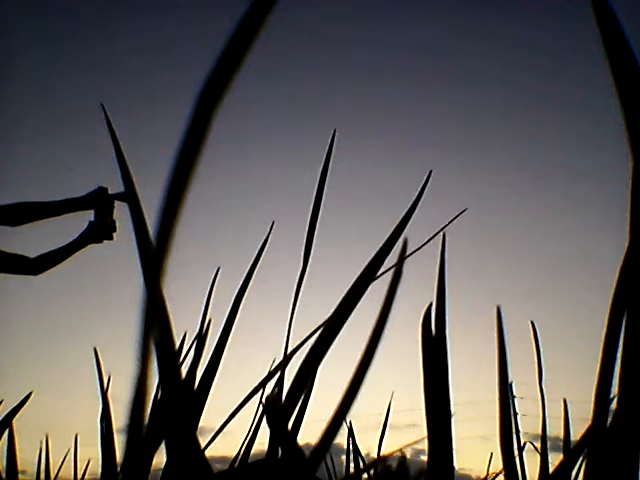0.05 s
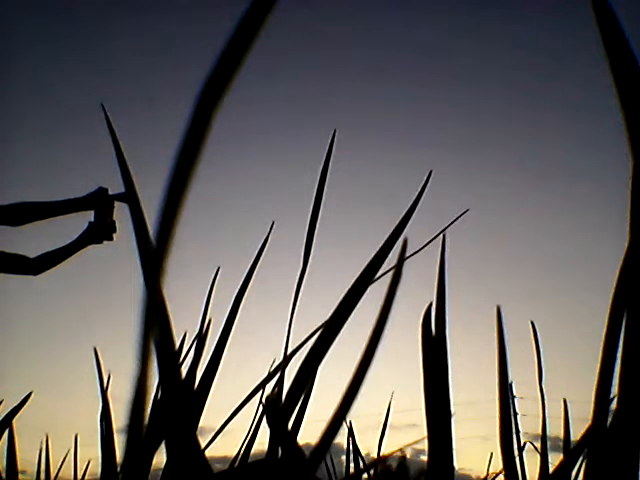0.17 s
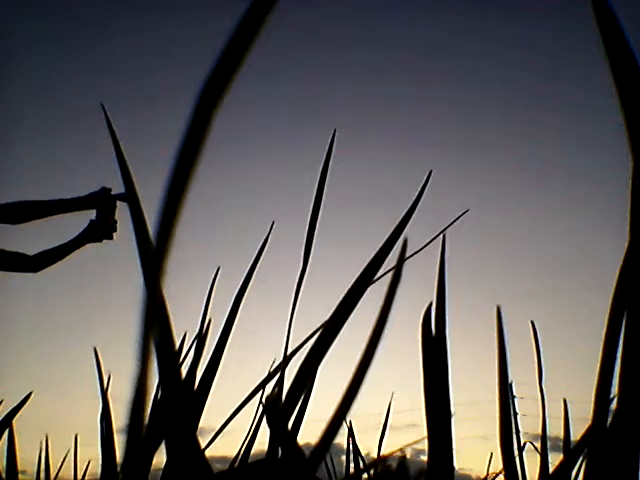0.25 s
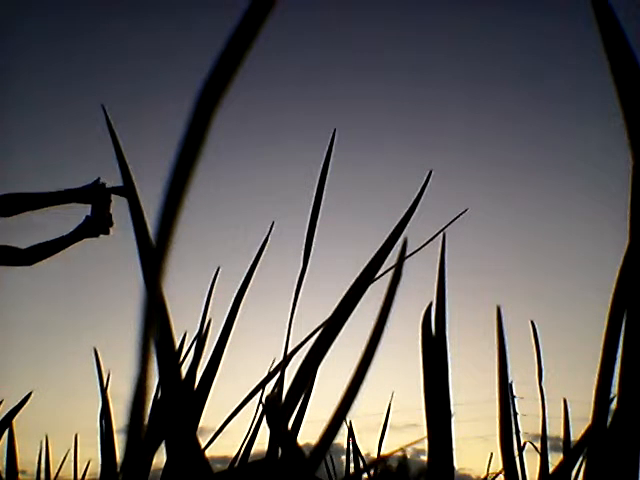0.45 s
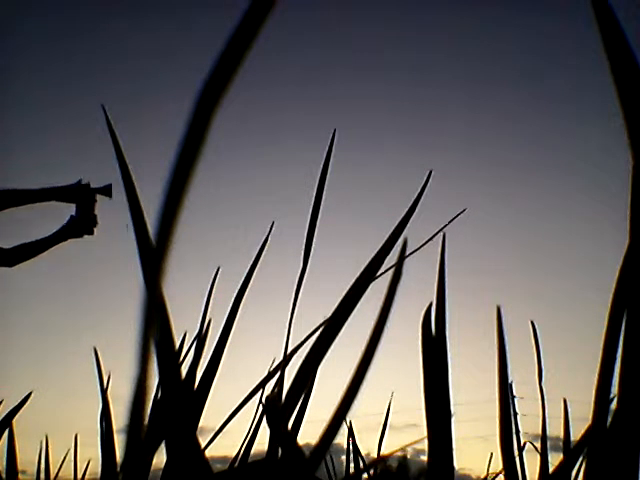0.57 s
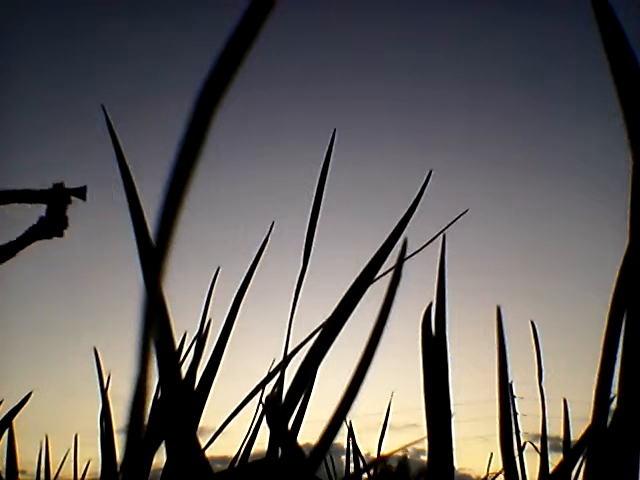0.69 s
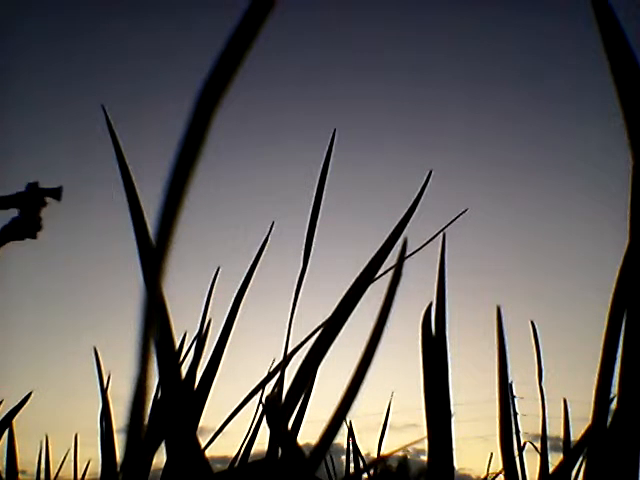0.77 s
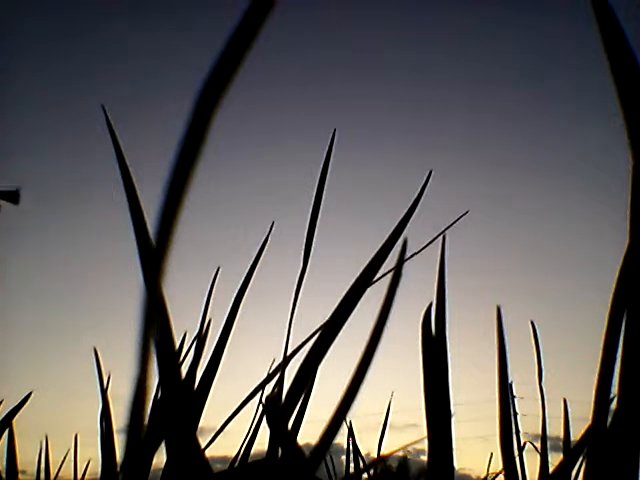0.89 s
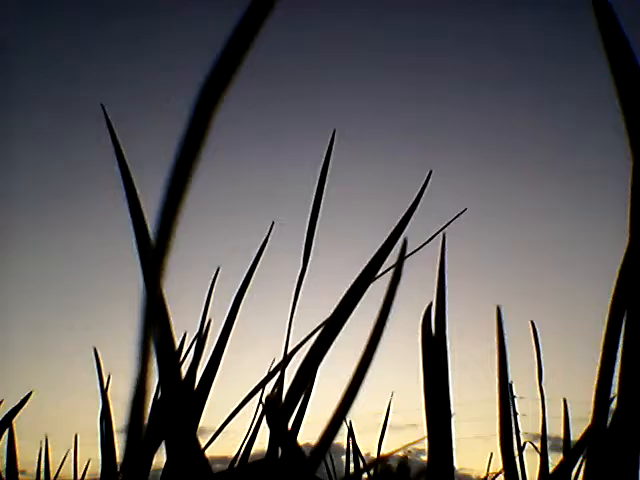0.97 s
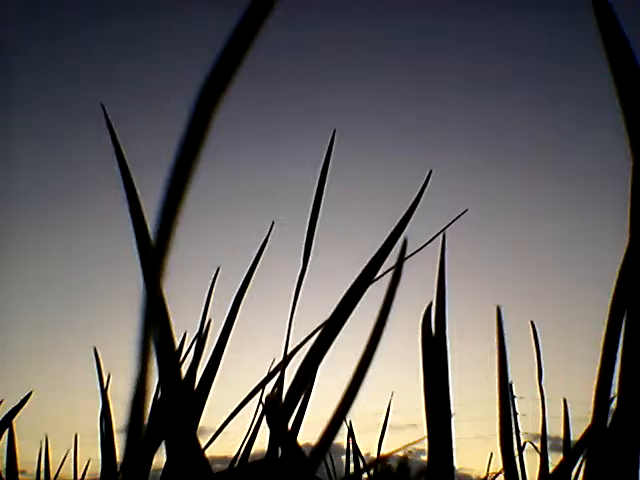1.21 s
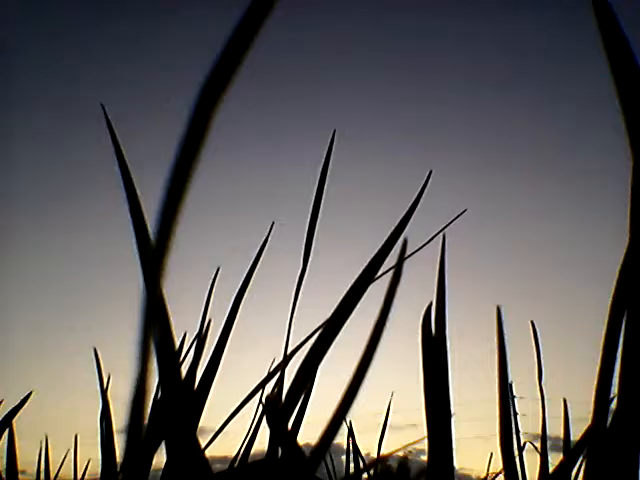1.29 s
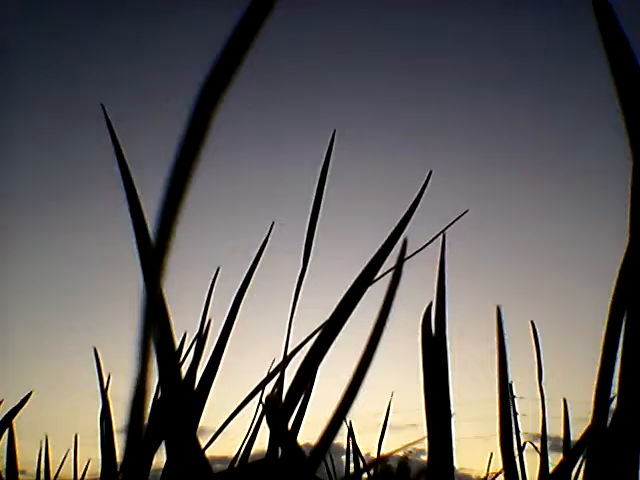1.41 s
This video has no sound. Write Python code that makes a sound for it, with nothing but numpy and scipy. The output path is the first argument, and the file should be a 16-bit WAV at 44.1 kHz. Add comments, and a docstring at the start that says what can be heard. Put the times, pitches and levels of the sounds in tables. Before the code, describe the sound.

One short air horn blast with a hiss, echoing outdoors over a faint distant rumble.

```python
"""Gas horn in a field

A hand-held gas horn gives one short blast at dusk, over a distant rumble. Gas hisses out; the diaphragm
starts high, drops onto its note and turns brassy, and the blast overloads the microphone with a low
thump. The field and far trees reflect the sound to that stereo microphone in the grass, whose gain
control ducks the rumble under the blast and lets it back up a second later."""
import sys
import numpy as np
from scipy.fft import rfft, irfft, next_fast_len
from scipy.io import wavfile
from scipy.ndimage import uniform_filter1d, minimum_filter1d, map_coordinates

SR = 44100
rng = np.random.default_rng(int(sys.argv[2]) if len(sys.argv) > 2 else 0)


def to_wav(s):
    """Save 16-bit WAV."""
    ch = np.atleast_2d(s).T  # columns
    pcm = np.round(np.clip(ch, -1, 1) * 32767)  # PCM
    wavfile.write(sys.argv[1], SR, pcm.astype(np.int16))


N = 63945
T = np.arange(N) / SR


def amp(db):
    """Amplitude ratio of a level in decibels."""
    return 10 ** (np.asarray(db) / 20)


def unit(x):
    """Normalisation to rms 1."""
    return x / np.sqrt(np.mean(x ** 2) + 1e-20)


def curve(rows, ends=None):
    """Linear interpolation of (seconds, value) rows at every sample."""
    return np.interp(T, *np.transpose(rows), left=ends, right=ends)


def wobble(rate):
    """Smooth random variation: a spline through rate knots a second."""
    return map_coordinates(rng.standard_normal(int(N * rate / SR) + 4), [T * rate])


def pan(db):
    """Two gains with a level difference of db, left minus right."""
    return amp([[db / 2], [-db / 2]])


def delayed(x, seconds):
    """Propagation delay, to a fraction of a sample."""
    return map_coordinates(x, [(T - seconds) * SR])


def convolve(x, h):
    """Response to x of a linear system with impulse response h."""
    size = next_fast_len(2 * N)
    return irfft(rfft(x, size) * rfft(h, size), size)[..., :N]


def colour(x, points, size=8192):
    """Minimum-phase filter through (Hz, dB) points, made by folding the cepstrum."""
    hz, db = np.transpose(points)
    gain = amp(np.interp(np.log(np.fft.rfftfreq(size, 1 / SR) + 1), np.log(hz), db))
    cepstrum = irfft(np.log(gain))
    cepstrum[1:size // 2] *= 2
    cepstrum[size // 2 + 1:] = 0
    return convolve(x, irfft(np.exp(rfft(cepstrum))))


def scatter(delay, t60, rise=.001):
    """Diffuse reflection: a stereo response of unit energy that builds up, then decays exponentially."""
    age = np.maximum(T - delay, 0)
    response = rng.standard_normal((2, N)) * (1 - np.exp(-age / rise)) * amp(-60 * age / t60)
    return unit(response) / np.sqrt(N)


# Rumble spectrum. Each row: frequency in Hz, relative density in dB.
RUMBLE_SPECTRUM = [(15, -53.5), (25, -23), (97, -1), (157, -3), (189, -4), (297, -11), (443, -20),
                   (493, -19), (563, -26.5), (735, -29), (862, -33.5), (1630, -48), (5270, -48),
                   (6520, -44.5), (14500, -49.5)]
# Stereo width. Each row: frequency in Hz, side relative to mid in dB.
RUMBLE_WIDTH = [(40, -19), (150, -16.5), (600, -3.5), (4000, 0.5)]
# Stereo balance. Each row: frequency in Hz, left minus right in dB.
RUMBLE_PAN = [(100, -2), (300, -3), (1200, -0.5), (4500, 0.5), (6300, -3), (9000, 4.5)]
# Slow swell. Each row: time in seconds, level in dB.
RUMBLE_LEVEL = [(0, -37.5), (.2, -33.5), (.7, -33), (1.44, -36)]

def rumble():
    """Partial coherence: a far rumble is alike in both channels, its faint hiss much less so."""
    mid, side = colour(rng.standard_normal((2, N)), RUMBLE_SPECTRUM)
    side = colour(side, RUMBLE_WIDTH)
    hz, lean_db = np.transpose(RUMBLE_PAN)
    left = colour(mid + side, np.c_[hz, lean_db / 2])
    right = colour(mid - side, np.c_[hz, -lean_db / 2])
    return unit(np.array([left, right])) * amp(curve(RUMBLE_LEVEL))


# Escaping gas. Each row: time in seconds, level in dB.
HISS_LEVEL = [(.205, -54.5), (.218, -50), (.232, -27.5), (.242, -26.5), (.256, -5.5), (.29, -20),
              (.326, -29), (.355, -28.5), (.38, -57)]
# Hiss spectrum. Each row: frequency in Hz, relative density in dB.
HISS_SPECTRUM = [(300, -13.5), (1200, -24), (3000, -12), (5000, -4.5), (6400, 6.5), (7800, -4.5),
                 (10000, -2.5), (14500, -21)]

def valve_hiss():
    """Flow noise: gas hisses through the valve from just before the tone until it closes."""
    hiss = unit(colour(rng.standard_normal((2, N)), HISS_SPECTRUM))
    return hiss * amp(curve(HISS_LEVEL, ends=-120)) * pan(db=-4)


def rasping(settled_s=.29, fade_s=.028):
    """Starting transient: 1 while the diaphragm vibrates irregularly, 0 once it has settled."""
    return np.clip((settled_s - T) / fade_s, 0, 1)


# Diaphragm vibration. Each row: time in seconds, frequency in Hz.
PITCH = [(.232, 1030), (.24, 950), (.248, 818), (.255, 765), (.268, 720.2), (.286, 689.1), (.305, 681.5),
         (.322, 678.8), (.331, 691), (.345, 702.6)]
# Strength of the tone. Each row: time in seconds, level of the fundamental in dB.
TONE_LEVEL = [(.214, -67.5), (.229, -41.5), (.237, -7.5), (.244, 10), (.262, 10), (.3, 8), (.328, 7.5),
              (.338, -1), (.352, 0), (.364, -12), (.378, -62)]
# Wave steepness. Each row: time in seconds, upper harmonics relative to the fundamental in dB.
STEEPNESS = [(.236, -53.5), (.243, -40.5), (.249, -1.5), (.262, 2.5), (.29, -1.5), (.327, -2),
             (.335, -12.5), (.343, -29.5), (.37, -32)]

def horn():
    """Nonlinear steepening: the diaphragm's nearly pure tone sharpens into one pulse per cycle."""
    steady_jitter, rasp_jitter, shimmer_db = .0006, .013, 3
    steepening_order, bell_delay_s, bell_delay_at_hz = 5.6, .0002, 6000
    pitch = curve(PITCH)
    hz = pitch * (1 + (steady_jitter + rasp_jitter * rasping()) * wobble(rate=750))
    phase = 2 * np.pi * np.cumsum(hz) / SR
    steepness_db = curve(STEEPNESS) + shimmer_db * rasping() * wobble(rate=750)
    order = np.arange(1, 23)[:, None]
    # Dispersion: the bell's group delay grows in proportion to frequency.
    phase_lag = np.pi * bell_delay_s * (order * pitch) ** 2 / bell_delay_at_hz
    harmonic_db = steepness_db * np.tanh((order - 1) / steepening_order)
    harmonics = np.cos(order * phase - phase_lag) * (order * hz < SR / 2) * amp(harmonic_db)
    return harmonics.sum(axis=0) * amp(curve(TONE_LEVEL, ends=-120))


# Response of each microphone port to the horn. Each row: frequency in Hz, gain in dB.
LEFT_PORT = [(300, -7.5), (690, 0), (1370, -8), (2700, -9), (4700, -14.5), (5500, -9.5), (6700, -25.5),
             (8300, -16.5), (10200, -23.5), (11600, -26), (14500, -26.5)]
RIGHT_PORT = [(300, -6.5), (690, -1.5), (1370, -6.5), (2100, -17), (3400, -13.5), (4800, -5.5), (5500, -2),
              (6200, 1), (6850, -5), (8200, -18.5), (8900, -30), (12000, -12), (14500, -29)]
# Ground bounce, left port then right. Each row: delay in seconds, gain before filtering in dB.
GROUND_PATHS = [(.00305, -8), (.0032, -15)]
# Filtering by the ground. Each row: frequency in Hz, gain in dB.
GROUND_RESPONSE = [(1600, -7.5), (3000, -5.5), (10000, -8)]

def near_paths(tone):
    """Interference: the direct wave adds to its ground reflection and to scatter from the grass."""
    left = colour(tone, LEFT_PORT)
    right = delayed(colour(tone, RIGHT_PORT), seconds=.00011)
    direct = np.array([left, right])
    bounce = np.array([amp(db) * delayed(port, lag) for port, (lag, db) in zip(direct, GROUND_PATHS)])
    grass = amp(-22.5) * convolve(direct, scatter(delay=.0012, t60=.095))
    return direct + colour(bounce, GROUND_RESPONSE) + grass


# Filtering by the field. Each row: frequency in Hz, relative gain in dB.
FIELD_RESPONSE = [(300, -10), (690, -4), (1400, -7), (2100, -11.5), (2800, -10.5), (4500, -11), (6400, -11),
                  (9000, -14), (11000, -33), (14500, -46)]

def field_wash(tone):
    """Reverberation: dense reflections from the field merge into a fading wash."""
    wash = convolve(tone, scatter(delay=.02, t60=.64))
    return amp(-18.5) * colour(wash, FIELD_RESPONSE)


# Roughness of the thump. Each row: frequency in Hz, relative density in dB.
THUMP_SPECTRUM = [(15, -0.5), (45, -3.5), (120, -7), (300, -15), (600, -23.5), (1500, -51.5)]

def overload_thump(start_s=.244, rise_s=.003):
    """Rectification: the loud onset overloads the microphone, giving a low, rough thump."""
    age = np.maximum(T - start_s, 0) / rise_s
    pulse = amp(-8.5) * age * np.exp(1 - age)
    roughness = amp(-.5) * unit(colour(rng.standard_normal(N), THUMP_SPECTRUM))
    return pulse * (roughness - 1)


# Paths by way of the trees. Each row: delay in seconds, gain before filtering in dB,
# time to decay by 60 dB in seconds, left minus right in dB.
TREE_PATHS = [(0.224, -35, 0.089, -6), (0.303, -27.5, 0.15, -5.5), (0.368, -28, 0.1, -3.5),
              (0.428, -34, 0.61, -4.5), (.486, -37, 0.22, -4), (0.564, -44, 0.17, -28),
              (0.609, -44, 1.5, -3.5), (0.789, -53, 0.23, -10.5)]
# Colour of the echoes. Each row: frequency in Hz, left gain in dB, right gain in dB.
TREE_RESPONSE = [(300.44, -17.5, -28), (745, -24.5, -21.5), (1417.5, -17, -30), (2095, -15.5, -19),
                 (4039, -11, -17), (4920, -13.5, -15.5), (6295, -8.5, -4.5), (7100, -9.5, -12.5),
                 (8850, -11, -21), (10600, -30.5, -37.5), (13200, -42, -60)]

def tree_echoes(tone):
    """Directivity: the bell beams its treble at the trees, so their echoes return bright."""
    paths = sum(amp(db) * pan(pan_db) * scatter(delay, t60, rise=.0021)
                for delay, db, t60, pan_db in TREE_PATHS)
    left, right = convolve(tone, paths)
    hz, left_db, right_db = np.transpose(TREE_RESPONSE)
    return np.array([colour(left, np.c_[hz, left_db]), colour(right, np.c_[hz, right_db])])


def scene():
    """Superposition: horn, hiss, thump and reflections add to the rumble."""
    tone = horn()
    carried = tone * amp(3.5 * (.5 - rasping()))  # the settled note carries farther than the rasp
    blast = near_paths(tone) + valve_hiss() + overload_thump()
    return blast + field_wash(carried) + tree_echoes(carried) + rumble()


def record(dry):
    """Automatic gain control: the gain drops fast, holds and recovers; peaks clip; the band is limited."""
    limit_db, sense_s, hold_s, release_db_per_s = -2.5, .0053, .98, 53.5
    ceiling, top_hz, edge_hz = .87, 14900, 500
    power = np.abs(uniform_filter1d(dry ** 2, int(sense_s * SR), axis=1)).max(axis=0)
    excess_db = np.maximum(10 * np.log10(power + 1e-12) - limit_db, 0)
    hold = int(hold_s * SR)
    held_db = -minimum_filter1d(-excess_db, hold, origin=(hold - 1) // 2, mode="constant")
    duck_db = np.maximum.accumulate(held_db + release_db_per_s * T) - release_db_per_s * T
    ducked = dry * amp(-duck_db)
    clipped = ducked / (1 + np.abs(ducked / ceiling) ** 16) ** (1 / 16)
    size = next_fast_len(2 * N)
    lowpass = np.clip((top_hz - np.fft.rfftfreq(size, 1 / SR)) / edge_hz, 0, 1)
    return np.clip(irfft(rfft(clipped, size) * lowpass, size)[:, :N], -1, 1)


dry = scene()
out = record(dry)
to_wav(out)
```